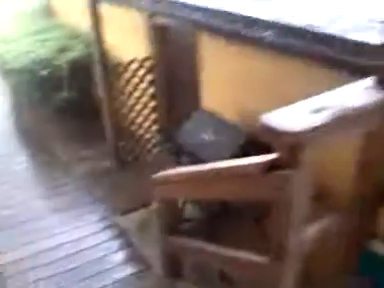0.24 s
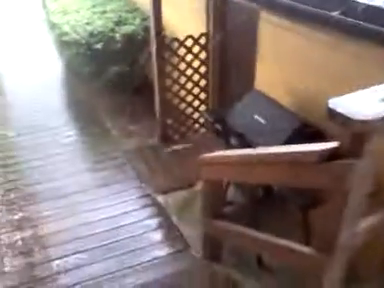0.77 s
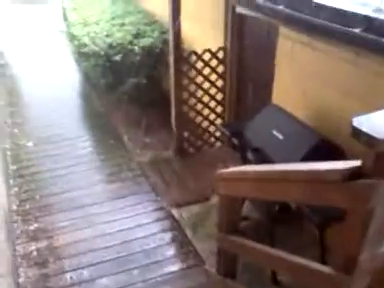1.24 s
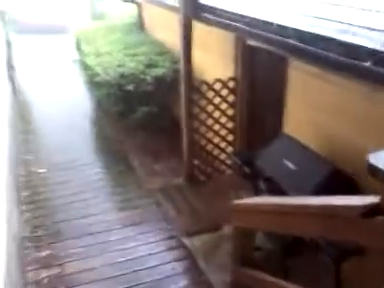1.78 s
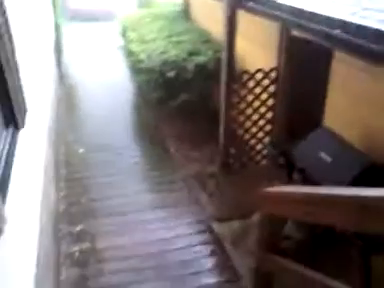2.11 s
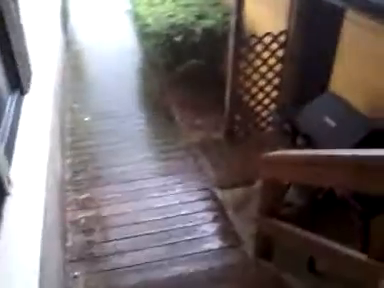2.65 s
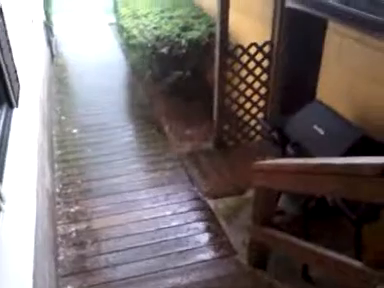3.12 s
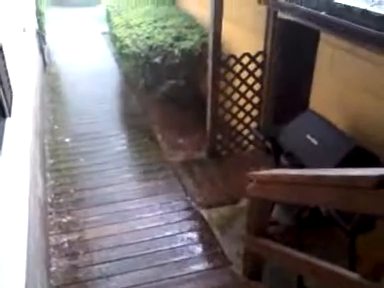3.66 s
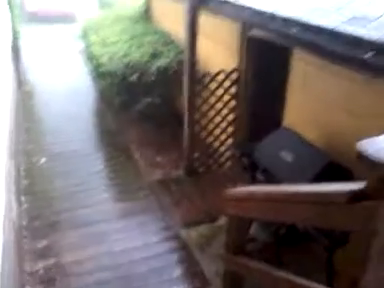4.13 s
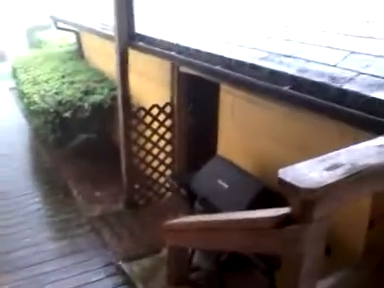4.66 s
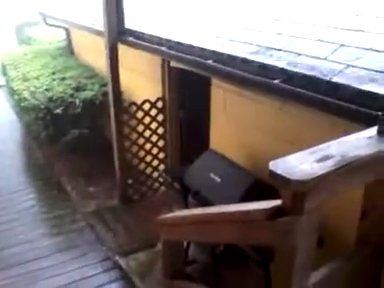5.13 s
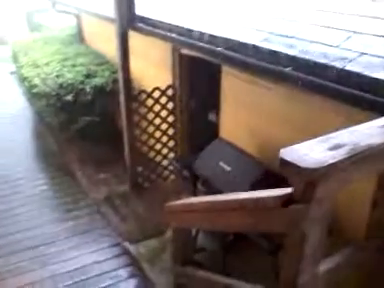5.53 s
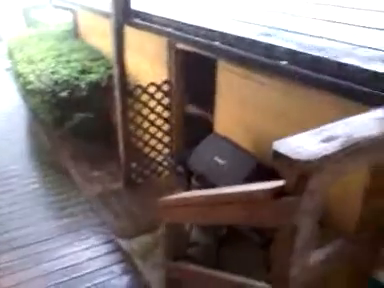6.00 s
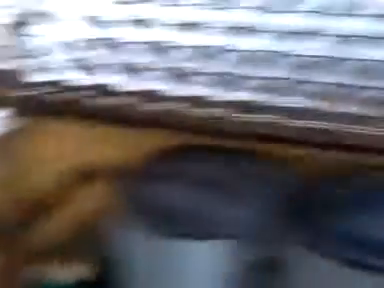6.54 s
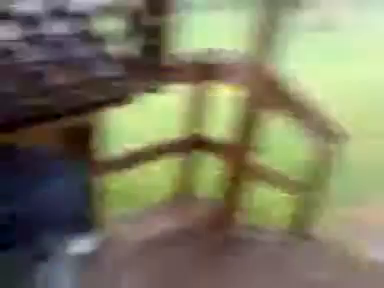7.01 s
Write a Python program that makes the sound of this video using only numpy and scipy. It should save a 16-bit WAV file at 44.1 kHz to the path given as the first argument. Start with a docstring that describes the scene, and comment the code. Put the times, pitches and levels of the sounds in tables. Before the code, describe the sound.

Heavy rain and hail are already in full fall, heard from a porch beside a wooden deck. A dense hiss from lawn and roofs runs throughout, flickering gently and easing slightly, packed with countless tiny ticks, dry snaps, softer clacks and short hollow plinks. Large stones crack close by at irregular gaps: a sharp one at 0.2 s, a run from 0.7 to 1.4 s, more around 1.9 to 2.5 s. The strongest cluster comes at 3.1 to 3.3 s, with a heavy, woody double knock and brief ringing. Further knocks follow near 3.85 s, with a bright ping just after; sharp cracks hit at 4.4, 5.0 and 5.24 s, the last with a high ring. After 5.9 s the near blows almost stop, leaving the rushing patter, with two more clacks near 6.8 and 7.0 s. The phone-like sound is narrow, dull on top, and clips on hard hits.

```python
"""Heavy rain and hail on a wooden deck, a shingle roof and a lawn, heard from a porch.
Shaped noise makes the hiss of the rain, and randomly timed ticks, snaps, clacks and notes make the small hail.
Large stones crack and clack close by as bursts of band-shaped noise, and some make boards and fittings ring.
The recorder rounds off hard blows, passes a narrow voice band and clips the peaks that are left."""
import sys
import numpy as np
from scipy import signal
from scipy.fft import rfft, irfft
from scipy.io import wavfile
from scipy.ndimage import uniform_filter1d

SR = 44100
rng = np.random.default_rng(int(sys.argv[2]) if len(sys.argv) > 2 else 0)


def materialize(psi):
    """Save the field psi as 16-bit PCM at rate SR to the path in sys.argv[1].

    A 1-D psi becomes a single channel; in a 2-D psi each row is a channel.
    """
    bounded = np.clip(np.atleast_2d(psi).T, -1, 1)
    quanta = np.round(bounded * 32767).astype(np.int16)
    wavfile.write(sys.argv[1], SR, quanta)


N = 321048  # length in samples


def gain_of(db):
    """Turns decibels into an amplitude gain."""
    return 10 ** (np.asarray(db) / 20)


def evened(x):
    """Scales a signal to rms 1."""
    return x / np.sqrt(np.mean(x ** 2) + 1e-20)


def read(points, hz):
    """Reads a spectrum in dB between its points, along a log-frequency axis."""
    f, value = np.transpose(points)
    return np.interp(np.log(hz + 1), np.log(f + 1), value)


def add(mix, s, sound):
    """Mixes a sound in at time s (seconds), cut off at the end of the mix."""
    part = mix[max(round(s * SR), 0):][:len(sound)]
    part += sound[:len(part)]


def burst(hz, spread_hz, t60, rise, size=8192):
    """A blow on a cluster of close modes: noise shaped around hz, with a rise and a decay in seconds."""
    t, f = np.arange(size) / SR, np.fft.rfftfreq(size, 1 / SR)
    resonance = 1 / (1 + ((f - hz) / (2 * spread_hz)) ** 2) ** 2
    modes = irfft(rfft(rng.standard_normal(size)) * resonance)
    fade = gain_of(-60 * t / t60) * (1 - np.exp(-t / rise))
    blow = modes * fade
    return blow * np.linalg.norm(fade) / np.linalg.norm(blow)  # as much energy as the fade itself


def far_rain(level_db=-3, patchy_db=2.5, flicker_db=0.5, hop_size=128):
    """Drops on lawn and roofs merge into a hiss: shaped noise that flickers and drifts in patches."""
    # relative colour of the far rain: (f/Hz, density/dB per Hz)
    wash_colour = [(20, -34.5), (50, -18.5), (95, -12.5), (170, -2.5), (270, -9), (450, -2.5), (750, -3),
                   (1100, -2.5), (1500, -3), (2000, 1), (2700, 0.5), (3400, -10), (4500, -3.5)]
    hz = np.fft.rfftfreq(4 * hop_size, 1 / SR)
    shape = (N // hop_size + 5, len(hz))  # frames, frequency bins
    real, imag, patches = rng.standard_normal((3,) + shape)
    # patches span time and pitch; the flicker moves all pitches together
    patches = uniform_filter1d(patches, size=14, axis=0)
    patches = evened(uniform_filter1d(patches, size=7, axis=1))
    flicker = evened(uniform_filter1d(rng.standard_normal(shape[0]), size=6))[:, None]
    colour_db = read(wash_colour, hz) + patchy_db * patches + flicker_db * flicker
    frames = (real + 1j * imag) * gain_of(colour_db)
    frames = frames * (hz < 5000)  # nothing from 5 kHz up
    hiss = signal.istft(frames.T, nperseg=4 * hop_size, noverlap=3 * hop_size)[1][:N]
    return gain_of(level_db) * evened(hiss)


def pellets(level_db=-6, per_s=1100, size_db=3.5, cycles=1.88, echo=0.62, echo_t60=0.072,
            count=36, size=3000):
    """Small ice and near drops: each spot ticks at its own pitch for a few cycles, then scatters."""
    # relative colour of the pellets: (f/Hz, level/dB)
    pellet_colour = [(300, -4.5), (600, -8), (1100, 2.5), (1500, -5), (2000, -0.5), (2700, -2.5),
                     (3600, -3)]
    t, out = np.arange(size) / SR, np.zeros(N)
    for hz in np.linspace(350, 3900, count):
        ring = np.exp(-t * (hz + 1000) / (2 * cycles)) * np.sin(2 * np.pi * hz * t)
        scatter = rng.standard_normal(size) * gain_of(-60 * t / echo_t60)
        scatter /= np.linalg.norm(scatter)
        tick = ring + echo * signal.fftconvolve(ring, scatter)[:size]
        tick = gain_of(read(pellet_colour, hz)) * tick / np.linalg.norm(tick)
        chance, weight = rng.random(N), rng.exponential(1, N)
        falls = (chance < per_s / count / SR) * gain_of(size_db * np.minimum(weight, 4))
        out += signal.oaconvolve(falls, tick)[:N]
    return gain_of(level_db) * evened(out)


def near_ticks(level_db=-10, per_s=110, size_db=3.5, tick_hz=2200, spread_hz=1100, t60=0.0055,
               echo_db=-17, echo_t60=0.1, count=12):
    """Pellets on the nearest planks: dry broadband snaps, each with a weaker, longer echo tail."""
    out = np.zeros(N)
    for _ in range(count):
        snap = burst(tick_hz, spread_hz, t60, 0.0001)
        tail = burst(tick_hz, spread_hz, echo_t60, 0.0042)
        weight = np.minimum(rng.exponential(1, N), 3)
        falls = (rng.random(N) < per_s / count / SR) * gain_of(size_db * weight)
        out += signal.oaconvolve(falls, snap + gain_of(echo_db) * tail)[:N]
    return gain_of(level_db) * evened(out)


def patter(level_db=-9.5, size_db=3.5, t60=0.092, knock_db=-9, count=170):
    """Middling stones land at random on boards farther off: a clack over a lower, softer knock."""
    out = np.zeros(N)
    for when, pitch, spread, weight, hollow in rng.random((count, 5)):
        clack = burst(1300 + 1900 * pitch, 200 + 350 * spread, t60, 0.00024)
        knock = burst(150 + 800 * hollow, 110, t60, 0.0021)
        strength = gain_of(-size_db * np.log(weight + 0.035))  # a few strong, most weak
        add(out, when * N / SR, strength * (clack + gain_of(knock_db) * knock))
    return gain_of(level_db) * evened(out)


def plinks(level_db=-11.0, size_db=2.5, t60=0.087, spread_hz=25, low_hz=130, high_hz=3000, count=280):
    """Stones on rails, gutter and boards: narrow bursts give brief hollow notes, weaker when low."""
    out = np.zeros(N)
    for when, pitch, weight in rng.random((count, 3)):
        hz = low_hz + (high_hz - low_hz) * pitch ** 2
        strength = gain_of(-size_db * np.log(weight + 0.11)) * (hz / high_hz) ** 0.38
        add(out, when * N / SR, strength * burst(hz, spread_hz, t60, 0.0012))
    return gain_of(level_db) * evened(out)


def downpour(start_db=-18.5, easing_db_per_s=0.3, surge_db=0.93, surge_hz=1.1, count=12):
    """Gain that follows how hard it is coming down: a slow easing with slight random surges."""
    t, surges = np.arange(N) / SR, np.zeros(N)
    for octave, phase in rng.random((count, 2)):
        hz = surge_hz * 2 ** (2 * octave - 1)  # within an octave either side
        surges += np.sin(2 * np.pi * (hz * t + phase))
    return gain_of(start_db - easing_db_per_s * t + surge_db * evened(surges))


def hailstones(crack_db=-2.0, crack_t60=0.035, crack_spread=1.45,
               clack_db=-2, clack_spread_hz=530, clack_t60=0.19, full_clack_db=-17, db_per_halving=5.5,
               note_db=-8, note_spread_hz=110, note_t60=0.1,
               board_db=1, board_hz=540, board_spread_hz=270, board_t60=0.15, board_lowest_hz=130,
               wall_echo_s=0.0048, wall_echo_db=-3):
    """Each large stone cracks, echoes off the house wall, clacks around a note and knocks the board."""
    # large hailstones, before the trims above:
    # (t/s, crack level/dB, clack level/dB, clack centre f/Hz, board knock level/dB)
    stones = [(0.094, -11.5, -12.5, 2230, -28.5), (0.198, -5, -10.5, 2950, -33),
              (0.338, -18, -11.5, 2330, -22), (0.668, -11, -20, 2360, -40), (0.720, -7, -19, 2160, -27),
              (0.858, -8.5, -11, 2720, -28), (1.007, -9.5, -9.5, 2060, -38), (1.118, -8, -21, 2425, -34.5),
              (1.228, -20.5, -17.5, 1810, -35), (1.358, -15.5, -14.5, 2550, -38),
              (1.402, -18.5, -16.5, 2320, -27.5), (1.615, -17, -15, 2340, -19),
              (1.879, -12.5, -11.5, 2780, -35.5), (1.897, -16.5, -12.5, 2290, -37),
              (1.943, -16, -15.5, 2590, -42), (2.101, -8, -10, 2340, -16.5), (2.182, -9, -16.5, 2540, -19),
              (2.231, -14.5, -15, 1890, -38.5), (2.288, -18, -12.5, 2160, -37),
              (2.31, -16.5, -14, 2670, -36), (2.497, -14, -13.5, 1650, -28), (2.765, -9, -17.5, 2330, -36),
              (3.116, -6, -7.5, 2100, -23.5), (3.142, -7, -15.5, 2100, -19.5),
              (3.281, -11.5, -6.5, 2390, -11.5), (3.292, -9.5, -6, 1740, -11.5),
              (3.499, -9, -16.5, 1840, -39), (3.721, -12.5, -23, 2640, -34.5),
              (3.837, -8.5, -12, 2346, -16.5), (3.853, -15, -16.5, 1970, -16.5),
              (4.198, -9.5, -11.5, 2300, -32), (4.367, -16.5, -18.5, 2320, -25),
              (4.403, -6.5, -10.5, 2630, -37), (4.512, -19.5, -14.5, 1830, -21.5),
              (4.533, -13, -13.5, 1990, -29), (4.648, -16.5, -13, 2150, -24),
              (4.763, -18.5, -13, 2790, -20.5), (5.008, -4, -7.5, 2945, -22), (5.169, -12, -11, 2160, -33),
              (5.19, -10.5, -10.5, 2600, -31), (5.239, -5, -18, 3490, -41.5),
              (5.303, -20, -13.5, 2670, -23.5), (5.383, -10, -14, 2790, -30.5),
              (5.488, -22, -20, 1980, -17.5), (5.833, -13.5, -16.5, 1520, -37),
              (5.934, -11, -15, 2620, -26.5), (6.838, -12.5, -11, 2130, -37),
              (7.011, -11.5, -19.5, 2180, -22.5)]
    out, boards = np.zeros((2, N))
    for s, crack, clack, hz, knock in stones:
        # stones lighter than a full clack die away sooner
        t60 = clack_t60 * 2 ** (min(clack - full_clack_db, 0) / db_per_halving)
        for delay, db in [(0, 0), (wall_echo_s, wall_echo_db)]:
            snap = burst(hz, crack_spread * clack_spread_hz, crack_t60, 0.00018)
            add(out, s + delay, gain_of(crack + crack_db + db) * snap)
        add(out, s, gain_of(clack + clack_db) * burst(hz, clack_spread_hz, t60, 0.001))
        add(out, s, gain_of(clack + note_db) * burst(hz, note_spread_hz, note_t60, 0.0026))
        add(boards, s, gain_of(knock + board_db) * burst(board_hz, board_spread_hz, board_t60, 0.0033))
    # a narrow board radiates little at the bottom
    radiation = signal.butter(2, board_lowest_hz, "highpass", fs=SR, output="sos")
    return out + signal.sosfilt(radiation, boards)


def rings(level_db=-1, spread_hz=22, rise=0.0025, t60_at_1khz=0.12, damping=0.22):
    """Now and then a stone finds a board or a fitting with one clear note; low notes last longer."""
    # things set ringing by a stone, before the level trim: (t/s, f/Hz, level/dB)
    struck_notes = [(0.197, 3550, -14), (2.184, 380, -21.5), (2.498, 1185, -13), (3.215, 1884, -11),
                    (3.290, 380, -15), (3.305, 525, -14), (3.499, 1065, -14.5), (3.499, 1826, -12.5),
                    (3.862, 700, -13.5), (3.954, 2200, -8), (4.200, 512, -19), (4.304, 85, -23),
                    (4.365, 174, -21.5), (4.533, 1663, -11.5), (5.239, 3803, -7), (5.492, 282, -24),
                    (5.833, 1068, -16)]
    out = np.zeros(N)
    for s, hz, db in struck_notes:
        t60 = t60_at_1khz * (1000 / hz) ** damping
        add(out, s, gain_of(db + level_db) * burst(hz, spread_hz, t60, rise))
    return out


def scene():
    """The steady fall rides the downpour's gain, with the large stones and their rings on top."""
    fall = far_rain() + pellets() + near_ticks() + patter() + plinks()
    return (downpour() * fall + hailstones() + rings())[None]


def record(dry, headroom=0.81, ceiling=0.69, edge_hz=15900):
    """The input rounds off hard blows, a voice band narrows them, and leftover peaks clip and spit treble."""
    # response of the recorder's voice band: (f/Hz, level/dB)
    voice_band = [(8, -30.5), (25, -17), (50, -4.5), (80, -1), (3000, 1), (3350, 4), (3600, -4),
                  (3900, -11.5), (4250, -22), (4500, -35), (4800, -74.5), (5200, -100)]
    rounded = dry / (1 + (dry / headroom) ** 6) ** (1 / 6)
    response = gain_of(read(voice_band, np.fft.rfftfreq(N, 1 / SR)))
    narrow = irfft(rfft(rounded) * response, N)
    clipped = np.clip(narrow, -ceiling, ceiling)
    lowpass = signal.firwin(511, edge_hz, window=("kaiser", 9), fs=SR)  # trims the top of the clipping
    return signal.oaconvolve(clipped, lowpass[None], "same")


dry = scene()
out = record(dry)
materialize(out)
```